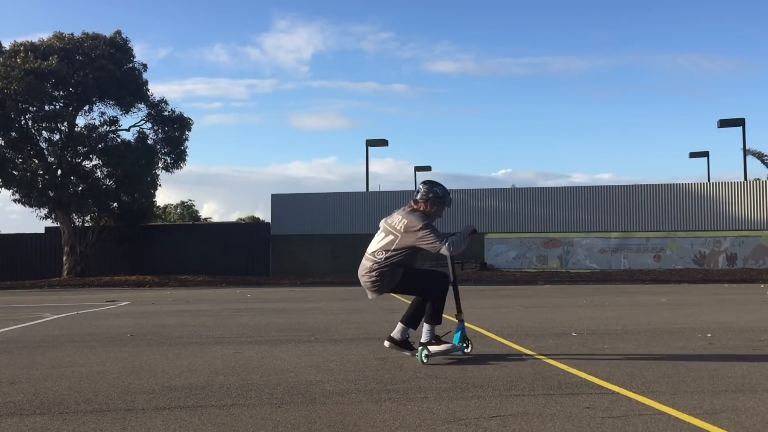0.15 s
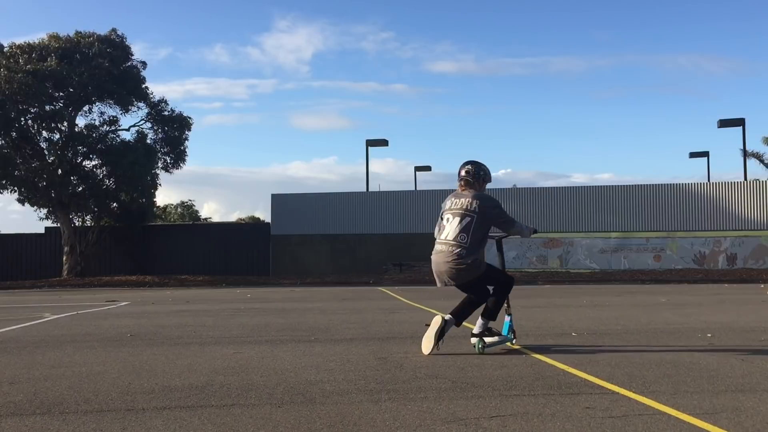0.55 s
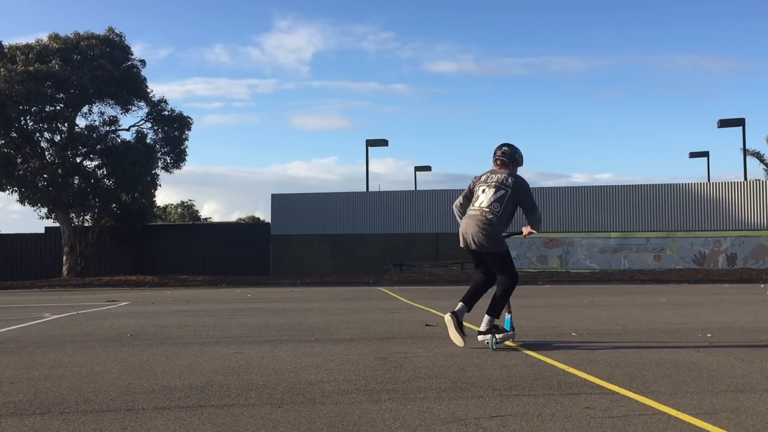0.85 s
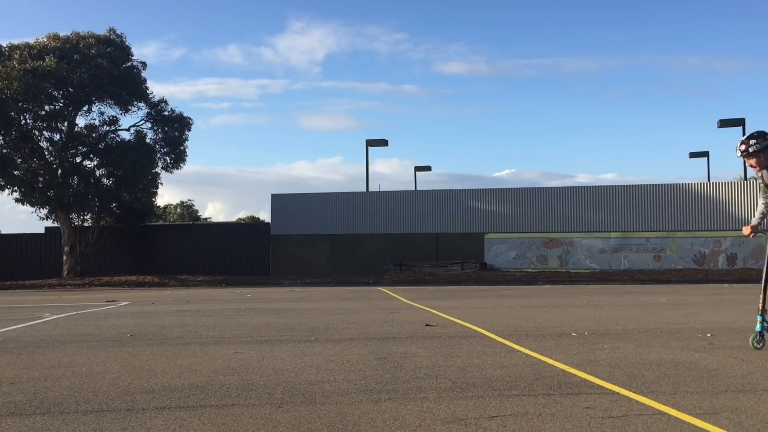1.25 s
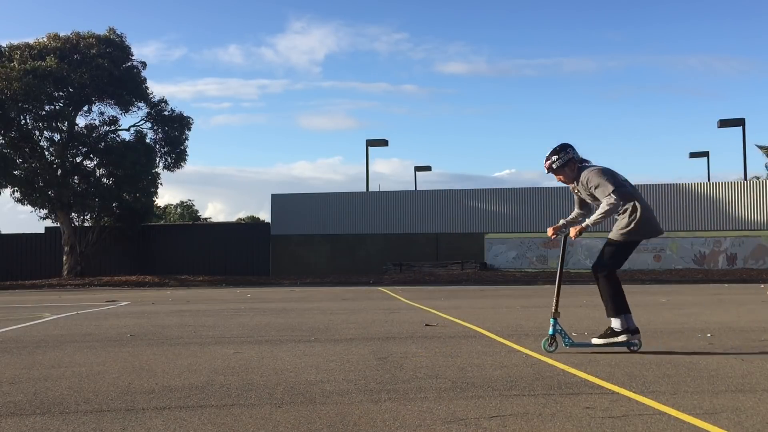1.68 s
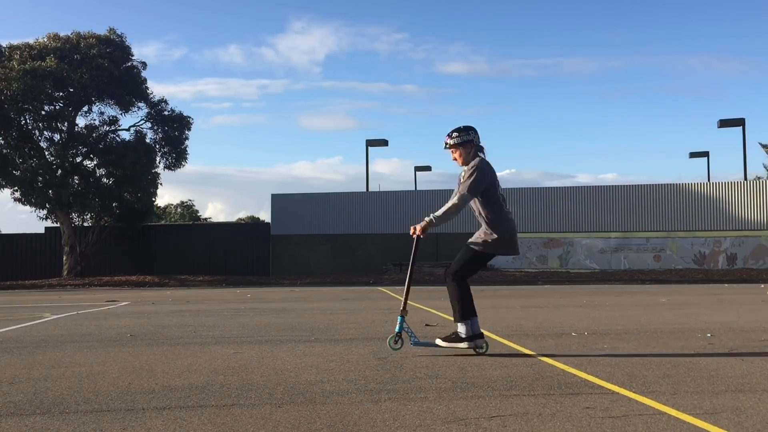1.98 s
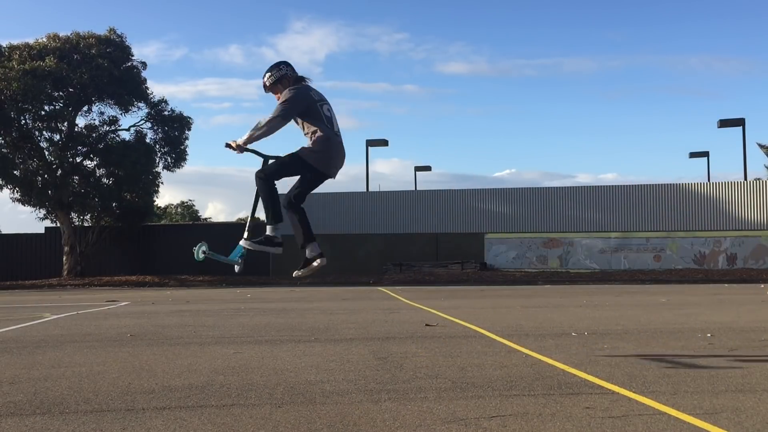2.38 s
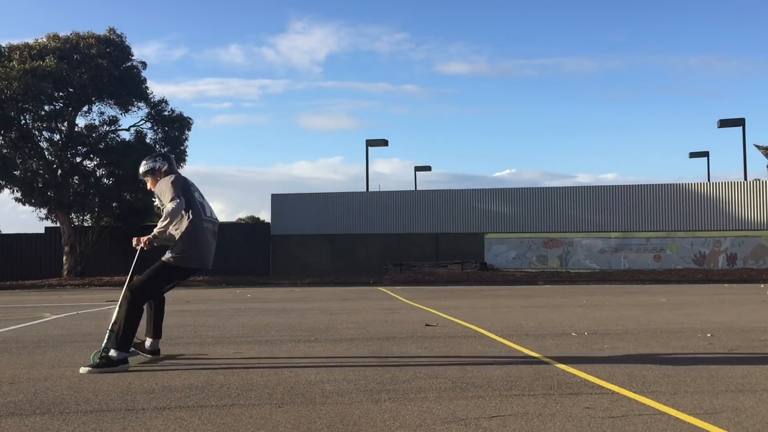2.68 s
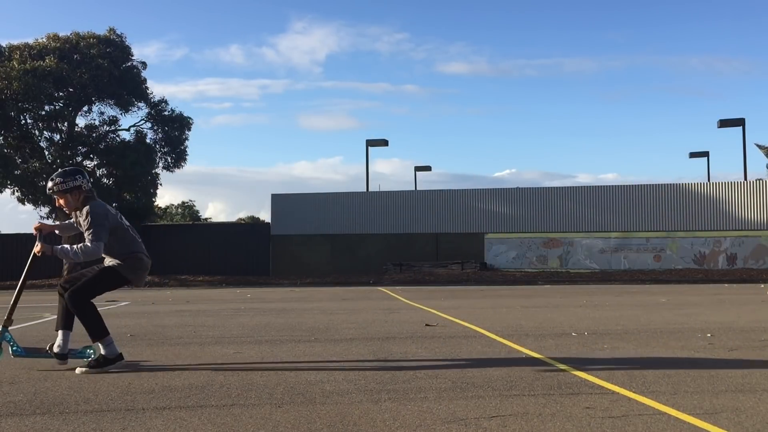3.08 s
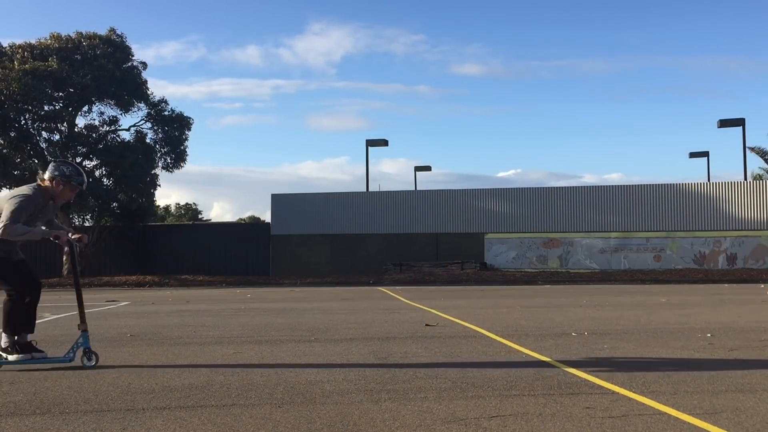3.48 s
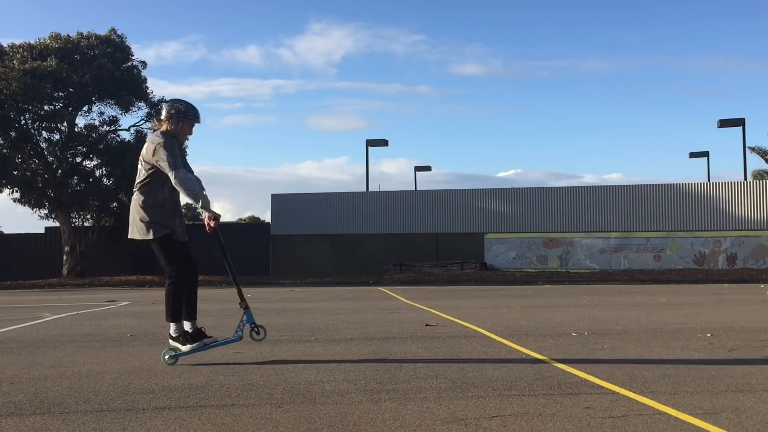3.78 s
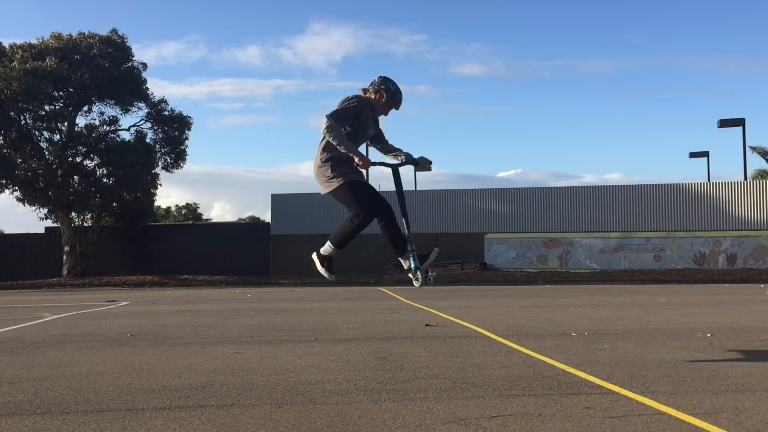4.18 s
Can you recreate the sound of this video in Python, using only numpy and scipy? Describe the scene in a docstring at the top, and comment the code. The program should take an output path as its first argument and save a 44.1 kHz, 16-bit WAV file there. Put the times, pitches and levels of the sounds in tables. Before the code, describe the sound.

At about 0.15 seconds a stunt scooter lands on asphalt with a hard, loud clack; its metal frame chatters and the yard's walls return a short echo. The wheels roll on quietly over grit with a faint whirr and small clinks. From 1.6 to 1.9 seconds comes a crunchy scrape with light rattles, as a low puff of air brushes the microphone. Shoes brush the deck softly around 2.2 seconds. A lighter knock and metal rattle at 2.6 seconds lead into a very sharp, loud landing at 2.8. Rolling resumes, with another gritty scrape around 3.5 seconds and faint clinks and shoe brushes near 4. A third, softer landing clacks at 4.3 seconds, right at the end. Faint distant town noise and light wind lie underneath, and the whole sound dips for an instant near 1 and 3.3 seconds.

```python
"""A hard clack: a stunt scooter lands the first of three flat-ground tricks on an asphalt schoolyard.
Each landing slams wheels and deck into the ground; the metal frame chatters, the walls echo.
Between landings the wheels whirr and roll over grit, shoes scrape, loose parts rattle and clink.
Distant town noise and light wind lie underneath. The overall level dips briefly twice."""
import sys
import numpy as np
from scipy import signal
from scipy.fft import rfft, irfft, next_fast_len
from scipy.io import wavfile
from scipy.ndimage import uniform_filter1d

SR = 44100
rng = np.random.default_rng(int(sys.argv[2]) if len(sys.argv) > 2 else 0)


def generate_wav(sig):
    """Save sig (samples, or channels by samples) to the path in sys.argv[1] as 16-bit PCM at SR."""
    pcm = np.round(np.clip(np.atleast_2d(sig).T, -1, 1) * 32767).astype(np.int16)
    wavfile.write(sys.argv[1], SR, pcm)


N = 191142
T = np.arange(N) / SR

# distant town (frequency [Hz], gain [dB])
TOWN_COLOUR = [(15, -28), (25, -18), (49, -5), (92, 0), (263, -5.5), (326, -5), (427, -14), (575, -23.5),
               (818, -22), (988, -14.5), (1480, -20), (1790, -25.5), (2550, -49), (5430, -38.5),
               (16000, -54.5)]
# distant tyre noise (time [s], level [dB])
TRAFFIC_LEVEL = [(0, -54.5), (2.6, -56), (3.4, -49), (4.33, -48)]
# wind on the microphone (time [s], level [dB])
WIND_LEVEL = [(0, -45), (1.2, -47), (1.85, -46), (2.6, -52), (4.33, -60.5)]
# wind spectrum (frequency [Hz], gain [dB])
WIND_COLOUR = [(20, -21), (45, -18), (85, 5.5), (130, -7), (250, -7.5), (1000, -24.5), (16000, -99)]
# passing rider's draught (frequency [Hz], gain [dB])
DRAUGHT_COLOUR = [(20, -2), (45, -4), (100, -11), (250, -32), (1000, -62), (16000, -100)]

# yard echo decay (frequency [Hz], t60 [s])
YARD_DECAY = [(100, 1.45), (300, 0.404), (900, 0.2935), (2000, 1.11), (5000, 0.76), (10000, 0.36),
              (16000, 0.8)]
# yard echo spectrum (frequency [Hz], gain [dB])
YARD_COLOUR = [(60, -27), (200, -3), (350, 2), (550, 5), (850, 7), (1400, -3.5), (2300, -9), (8000, -4),
               (16000, -11)]
# distinct wall echoes (delay [s], gain [dB])
WALL_ECHOES = [(.107, -21.5), (.137, -24.5), (0.291, -27)]
# wall reflection (frequency [Hz], gain [dB])
WALL_COLOUR = [(100, -9.5), (400, 2), (1200, -3.5), (3500, -6.5), (8000, -6), (16000, -15)]

# metal frame, broad spectrum (frequency [Hz], gain [dB])
FRAME_COLOUR = [(100, -71), (450, -4.5), (900, -4.5), (1600, 1), (2900, -6), (5500, -10.5), (9500, -14.5),
                (16000, -19)]
# frame resonances (frequency [Hz], width [Hz], lift [dB])
FRAME_MODES = [(1140, 65, 4.4), (1527, 290, 3.1), (2538, 39, 7.9), (2850, 87, 4.5), (3140, 57, 2.3),
               (3730, 820, 3.2), (4190, 300, 2.4), (4825, 70, 5.4), (5730, 270, 5), (5940, 38, 7.1),
               (6690, 110, 8.2), (7070, 70, 5.8), (7200, 22, 2.6), (7900, 72, 9.1), (8340, 190, 7.4),
               (8913, 84, 16.2), (9450, 210, 6.7), (9580, 66, 5.9), (10800, 84, 5.1), (11100, 150, 2.5),
               (12030, 850, 4.5), (13600, 200, 3.8), (13900, 130, 4.4), (14000, 140, 7.7),
               (15400, 140, 3.71)]
# wheel and bearing resonances (frequency [Hz], width [Hz], gain [dB])
WHIRR_MODES = [(2630, 120, 7), (2790, 30, -4), (3320, 12, -1), (3730, 250, 6.5), (4330, 160, 4.5),
               (4730, 170, 3.5)]
# spinning wheels (time [s], level [dB])
WHIRR_LEVEL = [(0, -60), (.7, -74), (1.45, -62.5), (2.0, -65), (2.5, -69.5), (3.2, -62), (4.33, -73)]
# roar of wheels and tyres (frequency [Hz], gain [dB])
ROAR_COLOUR = [(100, -23.5), (300, 1), (800, 7), (1400, -4), (2100, -12.5), (3300, -14.5), (5000, -40),
               (16000, -76)]
# stretches of rolling (start [s], end [s], roar [dB], grit gain [dB], trend [dB/s])
RIDES = [(0, -0.008, -42, -42.5, -4), (0.136, 1.03, -46, -58.5, -13), (1.03, 2.236, -53, -59.5, 3),
         (2.816, 3.3, -40.5, -52.5, -18), (3.316, 3.996, -51.5, -65, 7.5)]

# scrapes in the crouch before a jump (start [s], peak [s], end [s], peak level [dB], tilt [dB/octave])
SCRAPES = [(1.61, 1.695, 1.84, -38.5, 1), (3.355, 3.508, 3.593, -38.5, -0.8)]
# shoes on grip tape (start [s], peak [s], end [s], peak level [dB], tilt [dB/octave])
BRUSHES = [(2.19, 2.228, 2.284, -38.5, -3.5), (3.95, 3.974, 3.995, -39.5, -1.5),
           (4.06, 4.092, 4.104, -42.5, 3)]
# grit crunches within the scrapes (time [s], level [dB], tilt [dB/octave])
CRUNCHES = [(1.652, -30, -1.5), (1.676, -24, -3), (1.6943, -27.5, 2.5), (1.729, -32.5, 2.5),
            (1.741, -24.5, 1), (1.7745, -30, -0.5), (1.802, -36.5, 3), (1.823, -34.5, 0.5),
            (3.405, -38, 0.5), (3.4615, -28.5, -2), (3.483, -34, -1), (3.505, -30, -1.7),
            (3.569, -42.5, 2.5)]
# slipping grit (frequency [Hz], gain [dB])
RUB_COLOUR = [(100, -24), (500, -21), (1000, -4), (1600, 4.5), (2300, -3), (3300, -10), (5200, -13.5),
              (6800, -6.5), (8000, -16), (9700, -15.5), (11500, -24.5), (16000, -31)]
# loose metal parts (time [s], level [dB], pitch [Hz])
CLINKS = [(.337, -43.5, 5000), (.4257, -46, 5020), (2.227, -46, 8700), (3.256, -51.5, 8300),
          (3.885, -46.5, 5450), (3.969, -43.5, 8430), (3.992, -43, 5760)]
# jolts to fork, clamp and brake; the faint one at 0.29 s is the first landing's rattle returning off a wall
# (time [s], level [dB], t60 [s], tilt [dB/octave])
RATTLES = [(.1368, -17.5, 0.16, -4), (.1400, -18, 0.091, 2.5), (.152, -11.5, 0.025, -8.5),
           (.222, -34, 0.065, -1), (.290, -37.5, 0.028, 1), (.7100, -34, 0.061, -2.5),
           (1.155, -48.5, 0.12, 7), (1.232, -49.5, .15, 7.5), (1.5966, -30, 0.044, 4),
           (1.606, -32, 0.072, 3), (1.8728, -32.5, 0.016, 6), (1.885, -45.5, .09, 9),
           (1.9165, -40, 0.017, 4), (2.108, -48, .12, 2.5), (2.333, -51, .12, 1), (2.5702, -33, 0.1, -5),
           (2.579, -25.5, 0.061, -1.5), (2.590, -29.5, 0.2, 0.5), (2.616, -31, 0.32, -2.5),
           (2.663, -35, .05, -0.5), (2.833, -6, 0.024, -2.5), (2.8408, -24, 0.21, -2.5),
           (3.85, -47, 0.027, 2), (3.885, -42, 0.047, -2), (4.3035, -32.5, .04, -1), (4.31, -20, 0.072, -3),
           (4.319, -19.5, 0.061, -1)]

# deck and wheel modes under load (frequency [Hz], gain [dB], t60 [s])
DECK_MODES = [(123, -15, 0.13), (272, -31, 0.028), (384, 13, 0.011), (737, 3, 0.039), (936, 19.5, 0.01),
              (1254, 14.5, 0.019), (1695, -24, 0.024), (2305, 3.5, 0.056), (3034, 6.5, .022),
              (3870, -30, .014)]
# ground blows, a few per landing; long contact = dull (time [s], peak [dB], contact [s])
BLOWS = [(.1369, -11.5, 0.0003), (.1393, -11.5, 0.000052), (.1447, -11, 0.000017), (.1513, -8.5, 0.00034),
         (.1530, -1, 0.00015), (.1560, -9.5, 0.00039), (2.5730, -20, .00057), (2.5809, -16, 0.00024),
         (2.8187, -21, 0.00002), (2.8330, -1, 0.000038), (2.8348, 0.5, 0.00023), (2.835, -3.5, 0.0001),
         (4.3035, -12, 0.00027), (4.3095, -19, 0.0011)]

# brief dips in overall level (time [s], fall [s], rise [s])
LEVEL_DIPS = [(1.032, 0.037, 0.015), (3.297, 0.036, 0.034)]


def amp(db):
    """Decibels to gain."""
    return 10 ** (np.asarray(db) / 20)


def unit_rms(x):
    """Scale to rms 1."""
    return x / np.sqrt(np.mean(x ** 2) + 1e-20)


def at_hz(points, hz):
    """Interpolate on a log-frequency axis."""
    points_hz, values = np.transpose(points)
    return np.interp(np.log(hz + 1), np.log(points_hz + 1), values)


def envelope(curve):
    """Gain per sample from (time [s], level [dB])."""
    return amp(np.interp(T, *np.transpose(curve)))


def add(mix, at_s, sound):
    """Mix a sound in at at_s."""
    part = mix[max(round(at_s * SR), 0):][:len(sound)]
    part += sound[:len(part)]


def coloured(x, colour):
    """Filter by (frequency [Hz], gain [dB])."""
    size = next_fast_len(len(x))
    gain = amp(at_hz(colour, np.fft.rfftfreq(size, 1 / SR)))
    return irfft(rfft(x, size) * gain, size)[:len(x)]


def drift(points):
    """Random curve through evenly spaced points of unit spread."""
    return np.interp(T, np.linspace(0, T[-1], points), rng.standard_normal(points))


def wash(colour, patchy_db, size=1024):
    """Coloured noise, rms 1, drifting in patches of time and frequency."""
    hz = np.fft.rfftfreq(size, 1 / SR)
    real, imag, patches = rng.standard_normal((3, 4 * N // size + 5, len(hz)))
    patches = uniform_filter1d(patches, size=12, axis=0)
    patches = unit_rms(uniform_filter1d(patches, size=10, axis=1))
    spectra = (real + 1j * imag) * amp(at_hz(colour, hz) + patchy_db * patches)
    return unit_rms(signal.istft(spectra.T, nperseg=size, noverlap=size * 3 // 4)[1][:N])


def contacts(length, per_s, spread_db):
    """Random train of tiny, uneven knocks, rms 1."""
    strength = amp(spread_db * np.minimum(rng.exponential(1, length), 3))
    return unit_rms(strength * rng.choice([-1., 1.], length) * (rng.random(length) < per_s / SR))


def outdoors(town_db=-45, draught_db=-38, draught_peak_s=1.776, draught_width_s=0.12):
    """Distant town and traffic; wind and the rider's draught buffet the microphone."""
    town = amp(town_db) * wash(TOWN_COLOUR, patchy_db=3.5, size=2048)
    traffic = envelope(TRAFFIC_LEVEL) * wash(ROAR_COLOUR, patchy_db=2.0)
    gust = amp(draught_db) * np.exp(-((T - draught_peak_s) / draught_width_s) ** 2)
    draught = gust * unit_rms(coloured(rng.standard_normal(N), DRAUGHT_COLOUR))
    wind = envelope(WIND_LEVEL) * wash(WIND_COLOUR, patchy_db=3.5, size=2048)
    return town + traffic + draught + wind


def yard_echo(x, delay_s=0.0065, build_s=0.002):
    """Scatter from fences and walls; each band decays at its own rate."""
    hz, t, spectra = signal.stft(contacts(SR, per_s=3500, spread_db=1.5), SR)
    decay = amp(-60 * t / at_hz(YARD_DECAY, hz)[:, None])
    tail = signal.istft(spectra * decay, SR)[1][:SR]
    tail *= np.clip((np.arange(SR) / SR - delay_s) / build_s, 0, 1)
    return signal.fftconvolve(x, coloured(tail / np.linalg.norm(tail), YARD_COLOUR))[:N]


def wall_echoes(x):
    """One dull, late copy per wall."""
    out, dull = np.zeros(N), coloured(x, WALL_COLOUR)
    for delay_s, db in WALL_ECHOES:
        add(out, delay_s, amp(db) * dull)
    return out


def frame_ring(colour, tilt_db_per_oct, size=4096):
    """Frame response to one tiny contact, unit energy; a given tilt makes it brighter or duller above 400 Hz."""
    hz = np.fft.rfftfreq(size, 1 / SR)
    db = at_hz(colour, hz) + tilt_db_per_oct * np.log2(np.maximum(hz, 400) / SR)
    db += sum(lift_db / (1 + (2 * (hz - mode_hz) / width_hz) ** 2)
              for mode_hz, width_hz, lift_db in FRAME_MODES)
    log_gain = np.log(amp(np.r_[db, db[-2:0:-1]]))
    minimum_phase = np.exp(np.conj(signal.hilbert(log_gain)))
    ring = np.fft.ifft(minimum_phase).real[:size // 2]
    return ring / np.linalg.norm(ring)


def whirr(waver_db=4):
    """Spinning wheels excite narrow resonances that wander in pitch and level."""
    out = np.zeros(N)
    for hz, width_hz, db in WHIRR_MODES:
        lowpass = signal.butter(2, width_hz / 2, fs=SR, output="sos")
        flutter = unit_rms(signal.sosfilt(lowpass, rng.standard_normal(N)))
        cycles = np.cumsum(hz * (1 + .015 * drift(points=16))) / SR
        out += flutter * np.sin(2 * np.pi * cycles) * amp(db + waver_db * drift(points=40))
    return envelope(WHIRR_LEVEL) * unit_rms(out)


def ride_gain(fall_db_per_s, gritty, fade_in_s=0.033):
    """Grit or roar gain per stretch: fades in, follows the trend, dies away after the end."""
    gain = np.zeros(N)
    for start_s, end_s, roar_db, grit_db, trend_db_per_s in RIDES:
        elapsed_s, after_s = np.clip(T, start_s, end_s) - start_s, np.maximum(T - end_s, 0)
        db = (grit_db if gritty else roar_db) + trend_db_per_s * elapsed_s - fall_db_per_s * after_s
        onset = np.clip((T - start_s) / fade_in_s + 1, 0, 1)
        gain = np.maximum(gain, onset * amp(db))
    return gain


def stones(gain_db=-6.5, t60_s=0.049, per_s=40):
    """Larger stones jolt a wheel; the frame buzzes briefly."""
    t = np.arange(SR // 8) / SR
    jolts = abs(contacts(N, per_s, spread_db=2.5))
    shake = signal.oaconvolve(jolts, amp(-60 * t / t60_s))[:N]
    buzz = unit_rms(shake * contacts(N, per_s=6000, spread_db=1.5))
    return amp(gain_db) * signal.oaconvolve(buzz, frame_ring(FRAME_COLOUR, tilt_db_per_oct=2.5))[:N]


def rolling(grit_gain_db=-7.0, clump_db=2.5):
    """Patchy grit and stones tick through the wheels into the frame, over whirr and low roar."""
    ground = ride_gain(fall_db_per_s=178, gritty=True)
    patches = amp(grit_gain_db + clump_db * drift(points=200))
    ticks = ground * patches * contacts(N, per_s=1200, spread_db=-2)
    grit = signal.oaconvolve(ticks, frame_ring(FRAME_COLOUR, tilt_db_per_oct=-1.0))[:N]
    roar_gain = ride_gain(fall_db_per_s=66, gritty=False)
    return grit + ground * stones() + whirr() + roar_gain * wash(ROAR_COLOUR, patchy_db=2.0)


def clinks(t60_s=0.043, pitch_ratio=0.73, attack_s=0.00028):
    """Small loose parts ring with two tones each."""
    out, t = np.zeros(N), np.arange(SR // 8) / SR
    fade = np.minimum(t / attack_s, 1) * amp(-60 * t / t60_s)
    for at_s, db, hz in CLINKS:
        phase = 2 * np.pi * hz * t
        add(out, at_s, amp(db) * fade * (np.sin(phase) + .5 * np.sin(pitch_ratio * phase)))
    return out


def rasp(strokes, colour, lumpy_db=4.5, start_db=-14, end_db=-17):
    """Dense, uneven slips; each stroke swells to a peak and eases off."""
    out = np.zeros(N)
    slips = amp(lumpy_db * drift(points=500)) * contacts(N, per_s=2200, spread_db=3.0)
    for start_s, peak_s, end_s, db, tilt_db_per_oct in strokes:
        swell_db = np.interp(T, [start_s, peak_s, end_s], [start_db, 0, end_db])
        pressure = amp(db + swell_db) * (T > start_s) * (T < end_s)
        out += signal.oaconvolve(pressure * slips, frame_ring(colour, tilt_db_per_oct))[:N]
    return out


def chatter(jolts, colour, per_s, spread_db, uneven_db, full_scale_attack_s=0.00011, doubling_db=13.5):
    """Each jolt starts a dying flurry of contacts; each lands elsewhere, favouring other overtones."""
    out, t = np.zeros(N), np.arange(SR // 5) / SR
    hz = np.linspace(1000, 16000, 70)
    for at_s, db, t60_s, tilt_db_per_oct in jolts:
        attack_s = full_scale_attack_s * 2 ** (-db / doubling_db)  # weaker jolts swell more slowly
        shake = np.minimum(t / attack_s, 1) * amp(-60 * np.maximum(t - attack_s, 0) / t60_s)
        overtones = np.c_[hz, uneven_db * rng.uniform(-1.7, 1.7, len(hz))]
        flurry = shake * unit_rms(coloured(contacts(len(t), per_s, spread_db), overtones))
        add(out, at_s, amp(db) * signal.fftconvolve(flurry, frame_ring(colour, tilt_db_per_oct)))
    return out


def rubbing(crunch_t60_s=0.044):
    """Grit slips and crunches under shoe and brake; shoes brush the deck."""
    jolts = [(at_s, db, crunch_t60_s, tilt_db_per_oct) for at_s, db, tilt_db_per_oct in CRUNCHES]
    crunches = chatter(jolts, RUB_COLOUR, per_s=5000, spread_db=2.5, uneven_db=4.5)
    return crunches + rasp(SCRAPES, RUB_COLOUR) + rasp(BRUSHES, FRAME_COLOUR)


def landings(low_cut_hz=115):
    """Short ground pushes ring deck and wheels; blows are dealt in turn to three lanes."""
    lanes, t = np.zeros((3, N)), np.arange(SR // 10) / SR
    ring = sum(amp(db - 60 * t / t60_s) * np.sin(2 * np.pi * hz * t) for hz, db, t60_s in DECK_MODES)
    # a small body radiates little bass
    ring = signal.sosfilt(signal.butter(3, low_cut_hz, "high", fs=SR, output="sos"), ring)
    for k, (at_s, peak_db, contact_s) in enumerate(BLOWS):
        push = t * np.exp(-t / contact_s)
        clack = signal.fftconvolve(push, ring)[:len(t)]
        add(lanes[k % len(lanes)], at_s, amp(peak_db) * clack / abs(clack).max())
    return lanes


def scene(blow_echo_db=-5.0, metal_echo_db=-7.5):
    """Scooter, echoes and open air, mono."""
    lanes = landings()
    rattles = chatter(RATTLES, FRAME_COLOUR, per_s=12000, spread_db=1.5, uneven_db=1.5)
    metal = rattles + rubbing() + clinks()
    direct = lanes.sum(axis=0) + metal
    # blows rotate over three separate echo tails, so the yard's echo stays smooth
    echo = amp(blow_echo_db) * sum(yard_echo(lane) for lane in lanes)
    echo += amp(metal_echo_db) * yard_echo(metal)
    return (direct + echo + wall_echoes(direct) + rolling() + outdoors())[None]


def record(dry, dip_db=-27, low_cut_hz=58, high_cut_hz=16200):
    """Two brief level dips, microphone overload on the hardest landing, band limits."""
    for at_s, fall_s, rise_s in LEVEL_DIPS:
        fade = np.clip(np.maximum((at_s - T) / fall_s, (T - at_s) / rise_s), 0, 1)
        dry = dry * np.maximum(fade ** 1.15, amp(dip_db))
    clipped = np.clip(dry, -.95, .95)
    highpass = signal.butter(2, low_cut_hz, "high", fs=SR, output="sos")
    lowpass = signal.firwin(255, high_cut_hz, window=("kaiser", 8), fs=SR)
    return signal.oaconvolve(signal.sosfilt(highpass, clipped), lowpass[None], "same")


dry = scene()
out = record(dry)
generate_wav(out)
```